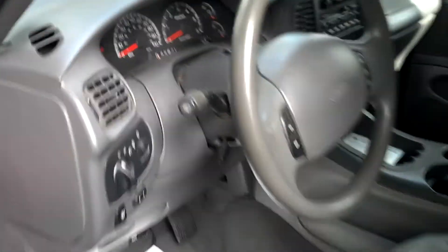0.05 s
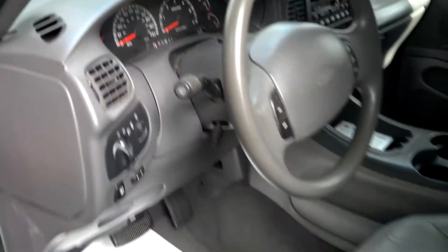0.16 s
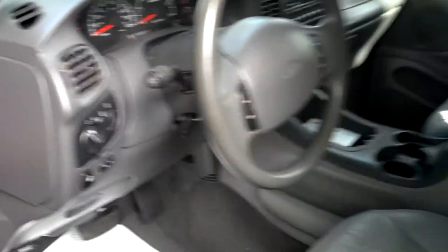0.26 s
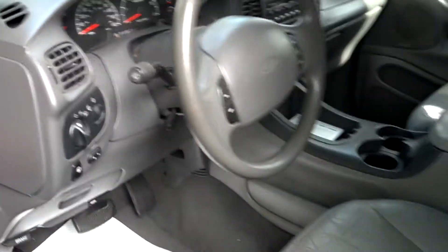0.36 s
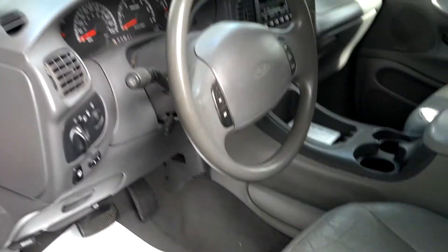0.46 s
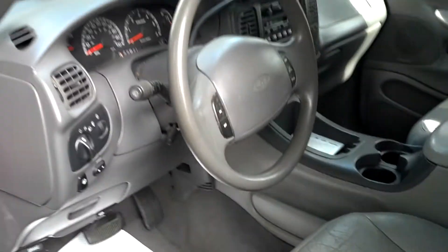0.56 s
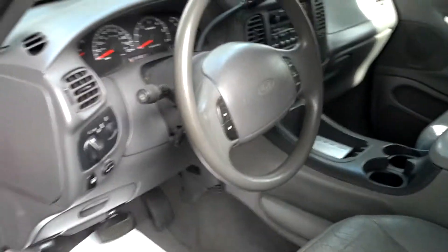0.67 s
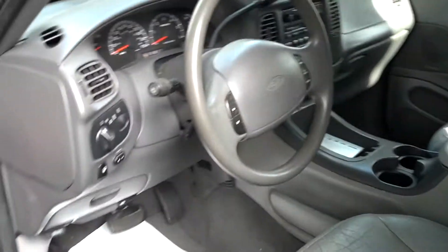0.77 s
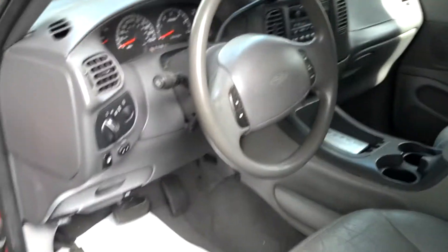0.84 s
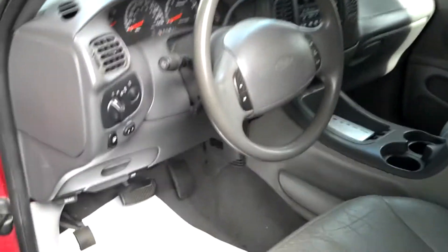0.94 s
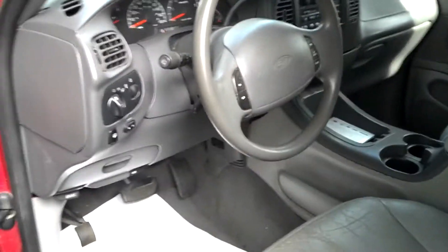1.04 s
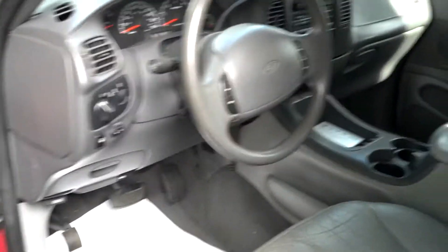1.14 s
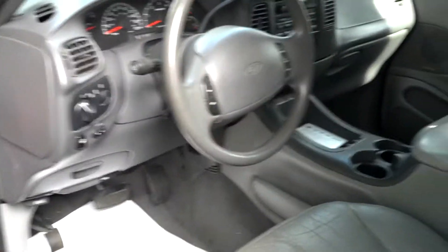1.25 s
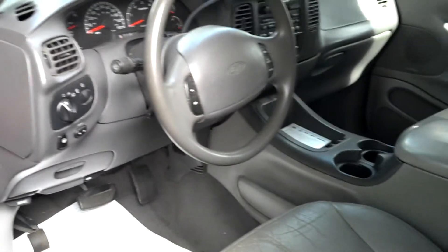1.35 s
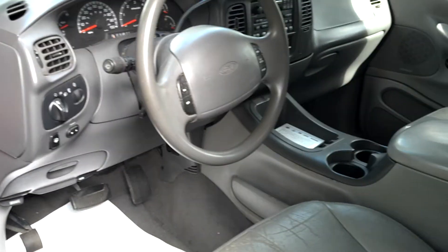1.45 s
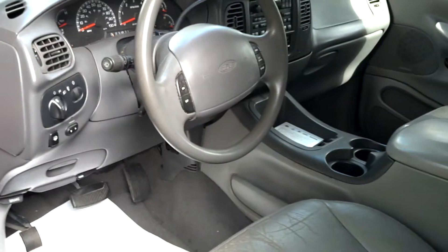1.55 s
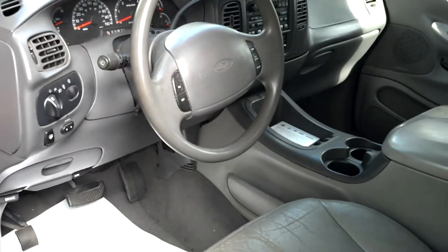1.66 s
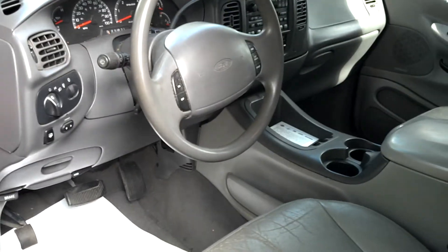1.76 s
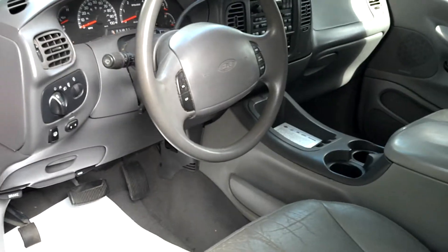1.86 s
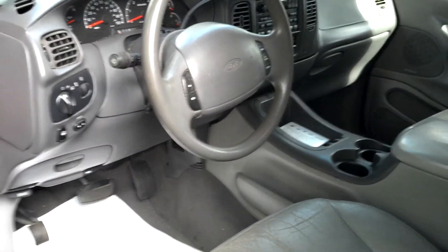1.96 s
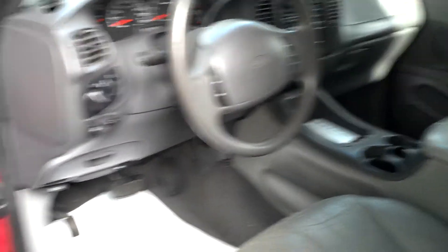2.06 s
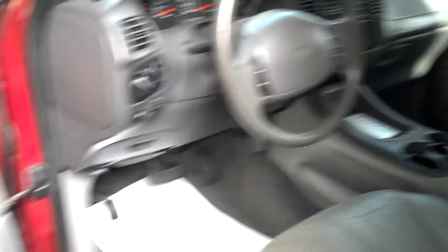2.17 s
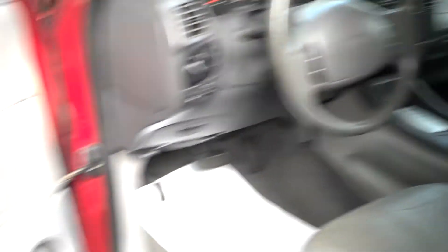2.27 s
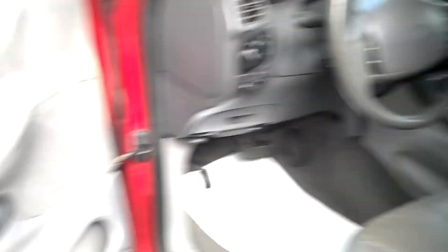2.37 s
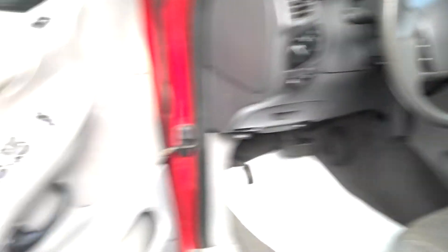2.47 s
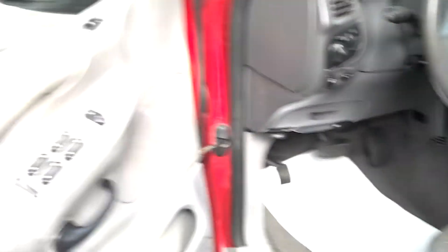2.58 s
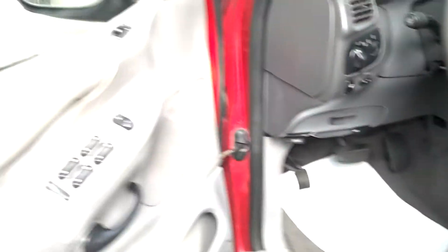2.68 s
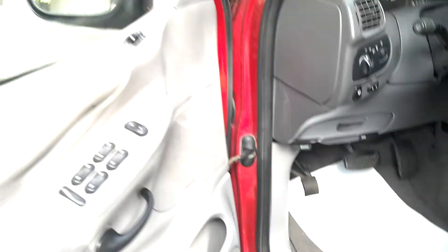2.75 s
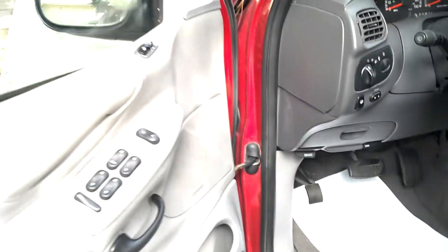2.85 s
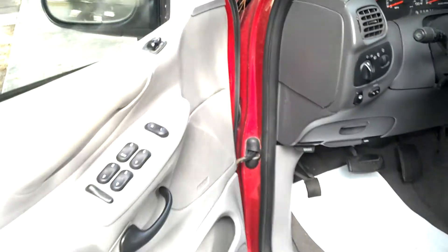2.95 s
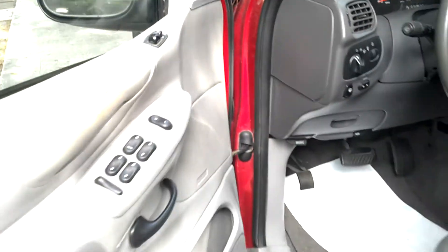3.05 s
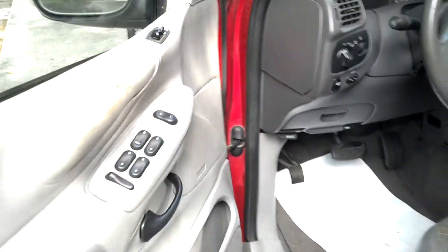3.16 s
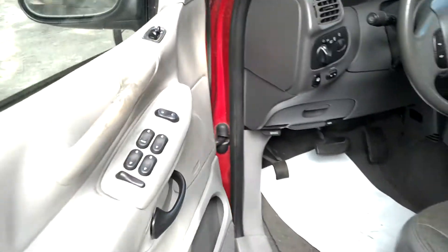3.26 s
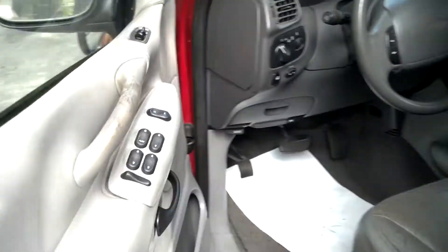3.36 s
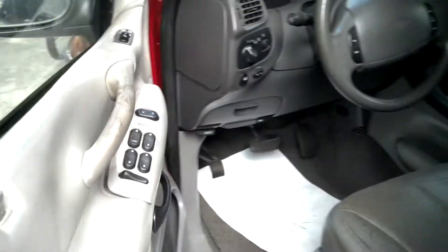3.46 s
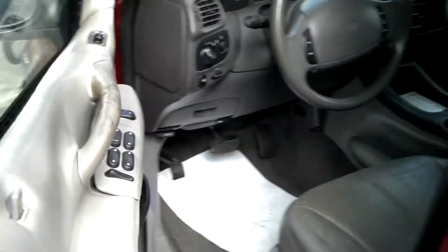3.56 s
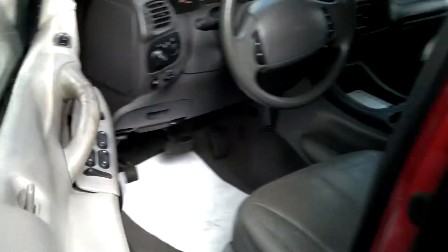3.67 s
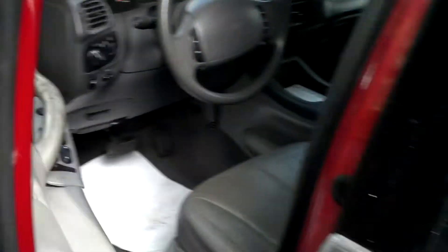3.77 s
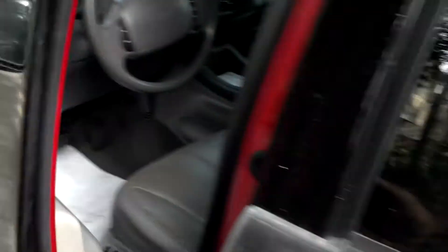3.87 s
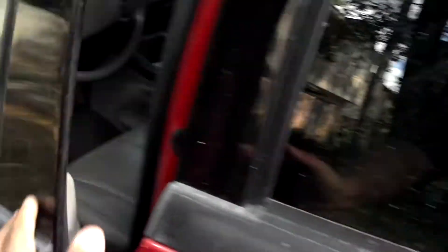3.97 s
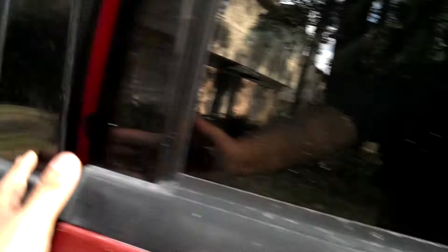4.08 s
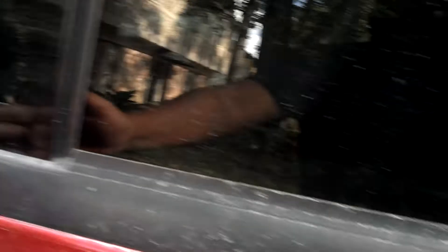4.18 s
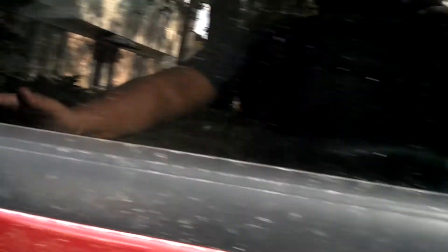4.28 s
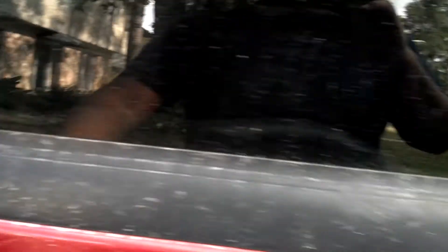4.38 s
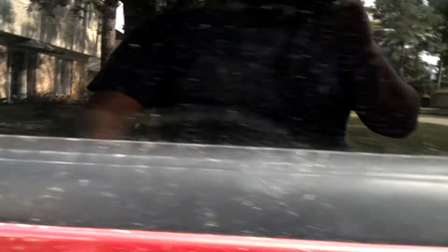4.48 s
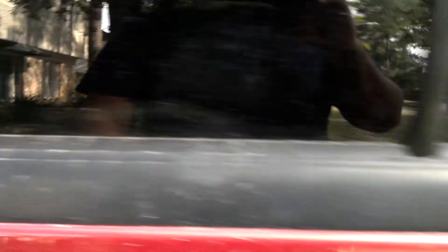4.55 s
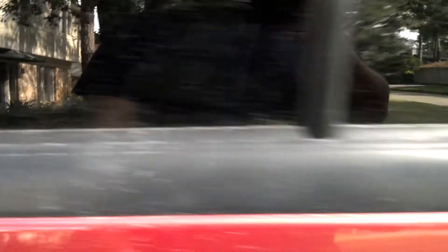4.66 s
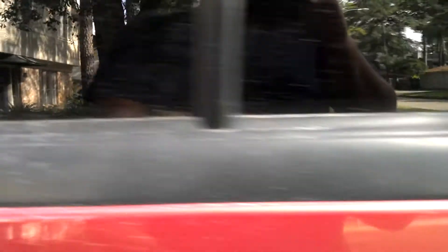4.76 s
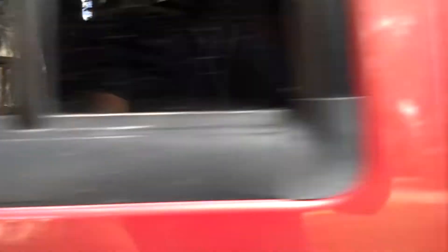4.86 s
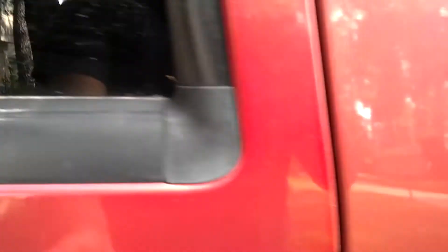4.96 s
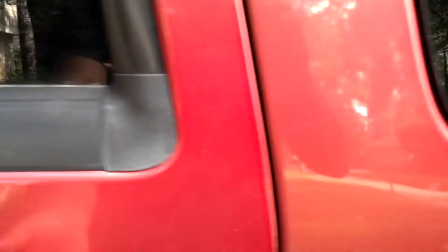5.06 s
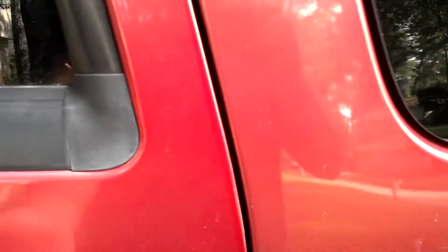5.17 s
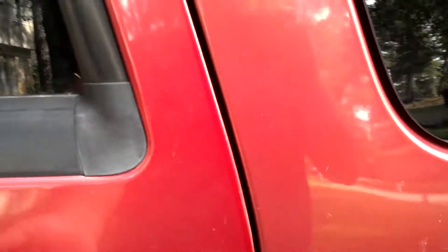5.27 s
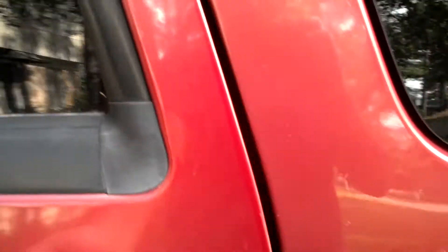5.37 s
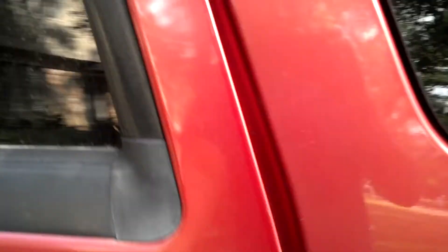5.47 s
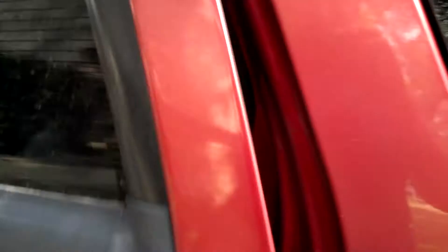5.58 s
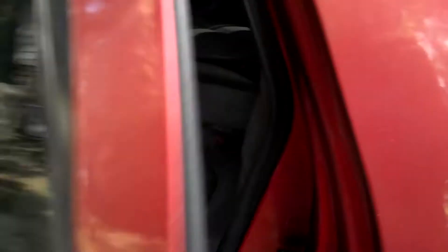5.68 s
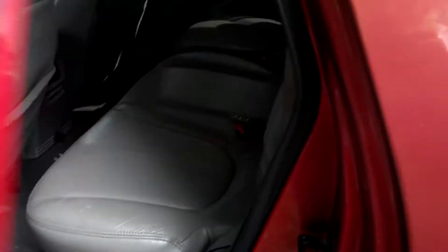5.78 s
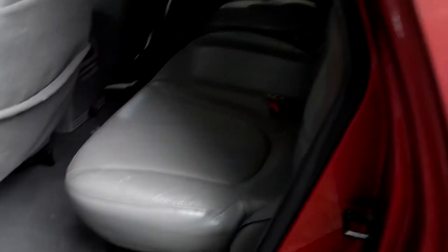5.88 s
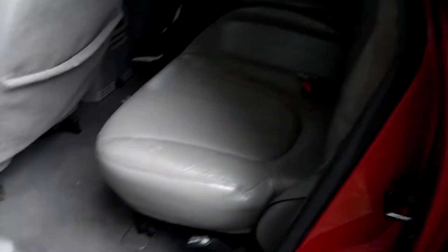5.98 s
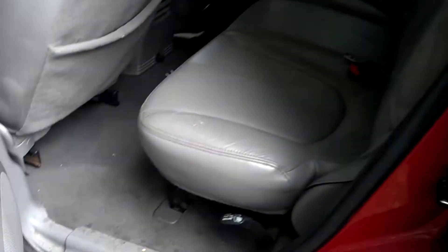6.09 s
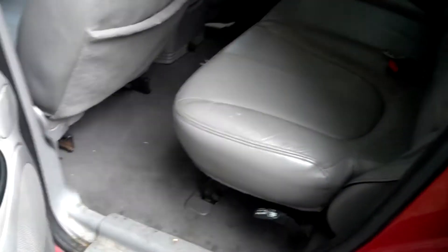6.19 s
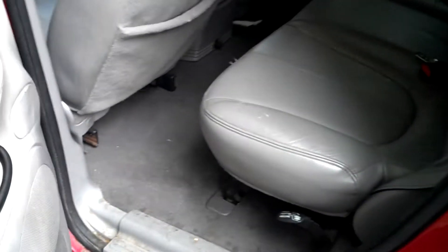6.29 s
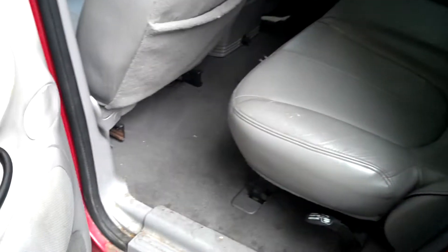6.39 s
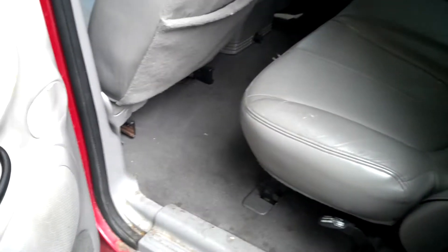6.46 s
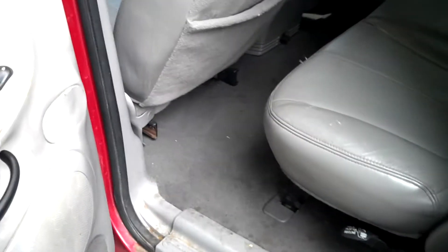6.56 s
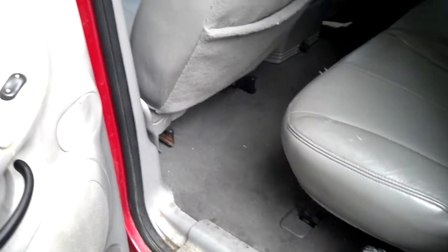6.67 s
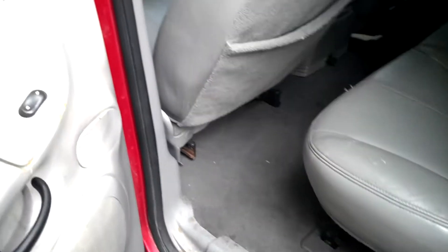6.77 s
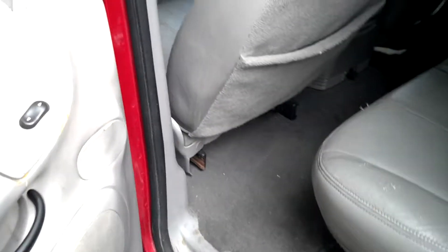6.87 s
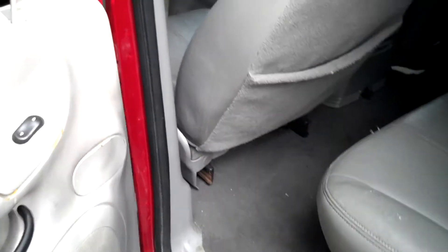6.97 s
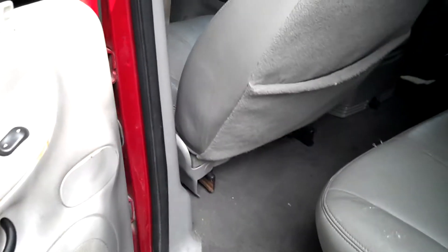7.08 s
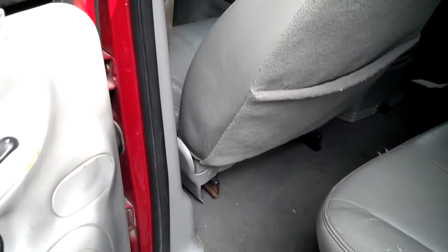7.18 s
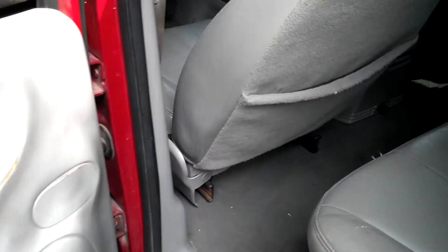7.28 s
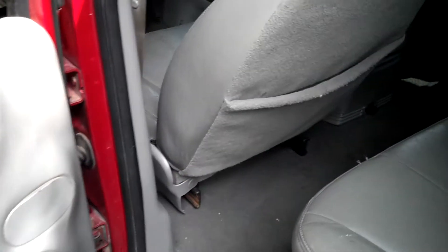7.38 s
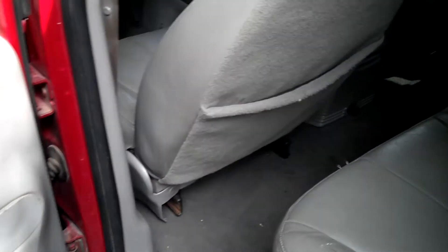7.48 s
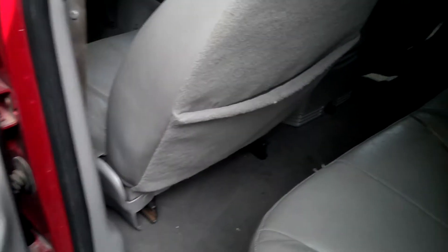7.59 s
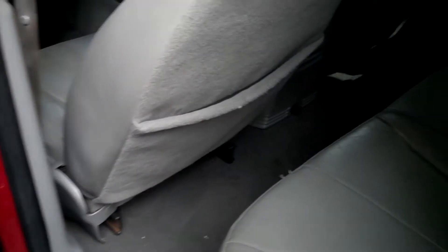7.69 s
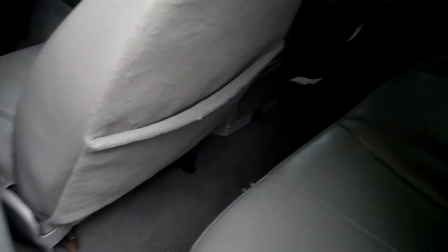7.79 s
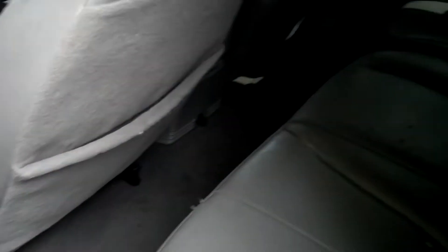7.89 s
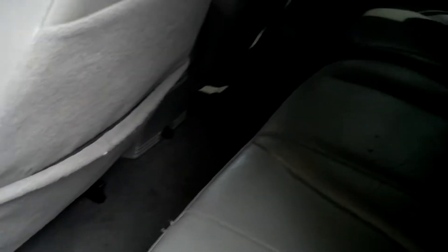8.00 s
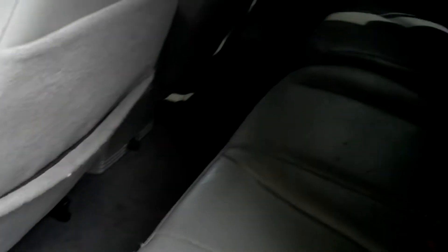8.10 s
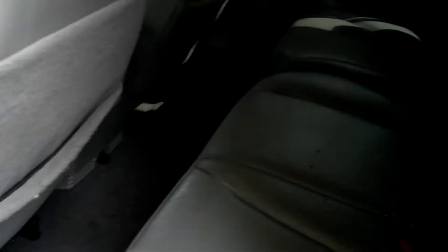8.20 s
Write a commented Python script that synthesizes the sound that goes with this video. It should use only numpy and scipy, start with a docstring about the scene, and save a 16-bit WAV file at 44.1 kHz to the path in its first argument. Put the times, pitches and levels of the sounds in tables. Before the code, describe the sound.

Outdoors in summer, a bright cicada hiss around 4 to 9 kHz, with thin shrill tones coming and going, lies over a low distant hum. Soft low microphone bumps occur near 0.6, 0.7, 1.4, 2.1, 2.4 and 2.6 seconds, and a faint brush at 3.5. At about 4.26 a car door slams loudly: a tiny falling steel squeal, clustered sharp metal cracks, hollow ringing panels, low seal thumps, and a rattle dying by 4.45, with a short yard echo. The background drops abruptly and slowly climbs partway back. Dull handling bumps follow from 4.5 to 5.0. A faint two-note falling bird whistle sounds at 5.0, then light handle ticks. At 5.44 the rear latch releases with a quick ringing clack, low knock and small rattle. Faint ticks and bumps continue around 5.9 to 7.2; the bird repeats at 6.7, and the hiss lasts until about 8.2.

```python
"""Beside a parked car on a summer day the front door is swung shut, then the rear door's latch is pulled open.
The slam is a sliding steel squeal, metal cracks, ringing panels and low seal thumps; the latch is a ringing clack.
Cicadas, coloured noise with shrill tones, hiss over a low distant hum, and a bird calls twice in gliding partials.
The hand-held microphone takes soft low bumps; ticks, brushes and a low latch knock are short bursts of noise.
The whole background drops at the slam and slowly creeps part of the way back."""
import sys
import numpy as np
from scipy import signal
from scipy.fft import rfft, irfft, next_fast_len
from scipy.io import wavfile

SR = 44100
rng = np.random.default_rng(int(sys.argv[2]) if len(sys.argv) > 2 else 0)


def dump_mix(stems):
    """Bounce the given channels to the path in sys.argv[1] as a 16-bit WAV at rate SR."""
    frames = np.atleast_2d(stems).T  # one column per channel
    limited = np.clip(frames, -1, 1)  # hard clip at full scale
    pcm = np.round(limited * 32767).astype(np.int16)
    wavfile.write(sys.argv[1], SR, pcm)


N = 363173


def slam(yard_s=4.285, yard_db=-33, crack_t60_s=0.029):
    """The claw rides over the striker and snaps home; the door hits its seal, rebounds and rattles."""
    # Metal contacts of latch and rebounding door. Each row: start in seconds, crack level in dB, body level in dB.
    contacts = [(4.2657, -13, -29), (4.2725, -6.5, -15.5), (4.2790, -14.5, -18), (4.295, -35, -33),
                (4.3136, -18.5, -23), (4.3168, -20, -23.5)]
    # Colour of the metal crack. Each row: frequency in Hz, level in dB per Hz.
    crack_colour = [(300, -32), (1000, -14), (2400, -4), (3500, 0), (4400, -7), (5500, 2.5), (7500, -0.5),
                    (11000, -7), (15500, -18)]
    # Door skin and trim. Each row: frequency in Hz, level in dB per Hz, t60 in seconds.
    door_body = [(50, -28, .15), (110.4, -5, .18), (200, -7, .13), (414, -2, 0.098), (700, -3.5, 0.049),
                 (1180, -7, 0.06), (2220, -11, 0.083), (3500, -16, .05), (7000, -30, .04),
                 (15000, -46, .04)]
    # Modes of hollow door and cabin. Each row: frequency in Hz, level in dB, t60 in seconds.
    panel_modes = [(128, -23, .3), (166, -19, 0.84), (240, -16, 0.19), (298, -7, 0.28), (427, -12, 0.14),
                   (620, -16, .16), (887, -27, 0.27), (1015, -19, .16), (1157, -27.5, .25),
                   (1580, -24, .18)]
    # Door pushing on its seal. Each row: start in seconds, level in dB, frequency in Hz, cycles to fullest swing.
    seal_pushes = [(4.2805, -9.5, 287, 0.57), (4.315, -13, 275, .6), (4.3712, -21, 280, 0.54)]

    out = latch_squeal()
    # the shut door rattles on in a dying run of touches
    dying_run = rattle(4.329, gap_s=0.0215, db=-30.5, loss_db=2.6, count=5)
    touches = [(s, db - 8.5, db) for s, db in dying_run]
    for s, crack_db, body_db in list(contacts) + touches:
        crack = noise(crack_colour, size=len(age())) * fade(crack_t60_s)
        add(out, s, from_db(crack_db) * crack)
        add(out, s, from_db(body_db) * clatter(door_body))
    for s, db, hz, cycles in seal_pushes:
        push = thump(hz, cycles) + from_db(-10) * ring(panel_modes)
        add(out, s, from_db(db) * push)
    add(out, yard_s, from_db(yard_db) * yard())
    return out


def latch_squeal(rasp_db=1.0):
    """Steel sticks and slips on steel: a rough squeal that falls as the claw turns."""
    # Claw rubbing over the striker. Each row: time in seconds, squeal pitch in Hz, level in dB.
    ride = [(4.2548, 1444, -90), (4.2558, 1420, -20), (4.2635, 1330, -19), (4.2680, 1120, -23.5),
            (4.2730, 1055, -19.5), (4.2790, 940, -26), (4.2880, 900, -90)]
    # Rasp of claw on striker. Each row: frequency in Hz, level in dB per Hz.
    rasp_colour = [(200, -35), (600, -2), (1300, -4), (2100, -4), (2900, -13), (3800, -20), (12000, -35)]
    hz, db = in_time(ride)
    squeal = wavering_tone(hz, wander_hz=89.8, rate=294)
    rasp = from_db(rasp_db) * long_noise(rasp_colour)
    return from_db(db) * (squeal + rasp)


def rattle(start, gap_s, db, loss_db, count):
    """A run of evenly spaced touches, each weaker than the last, as pairs of seconds and dB."""
    return [(start + k * gap_s, db - k * loss_db) for k in range(count)]


def yard(build_s=0.014):
    """The yard's answer to a blow builds up and dies away, each octave at its own rate."""
    # The yard's reverberation. Each row: frequency in Hz, level in dB per Hz, t60 in seconds.
    yard_body = [(60, -14, .4), (150, 4, 0.64), (420, -5, 0.68), (800, -15, 0.73), (1600, -11, 0.54),
                 (2800, -10, .38), (5000, -20, 0.33), (14000, -40, .2)]
    return clatter(yard_body) * (1 - np.exp(-age() / build_s))


def rear_door(lowest_hz=75, yard_db=-45):
    """The latch springs free with a ringing clack, and its rods rattle."""
    # Latch letting go. Each row: start in seconds, clack level in dB.
    releases = [(5.4358, -31), (5.4393, -18), (5.4424, -24), (5.4589, -32)]
    # Body of the clack. Each row: frequency in Hz, level in dB per Hz, t60 in seconds.
    clack_body = [(25, -45, .06), (65, -14, 0.087), (124, 2, 0.16), (280, -11, 0.099), (654, 2, .08),
                  (1100, -3.5, 0.044), (1920, 3.5, 0.051), (2930, -16, .045), (4600, -12, 0.056),
                  (7000, -19, .03), (15000, -36, .03)]
    # Modes that ring with the claw. Each row: frequency in Hz, level in dB, t60 in seconds.
    claw_modes = [(253, -17, 0.13), (402, -13, 0.09), (510, -17, 0.16), (662, -6, 0.097), (870, -14, 0.068),
                  (1160, -15, .14), (1450, -9, .06), (1640, -6, 0.07), (1809, -11.5, 0.27),
                  (1990, -12, 0.04), (2190, -21, 0.21), (2760, -18, .08), (4620, -18, 0.06)]

    out = np.zeros(N)
    rods = rattle(5.482, gap_s=0.015, db=-36.5, loss_db=6, count=3)
    for s, db in list(releases) + rods:
        add(out, s, from_db(db) * clatter(clack_body))
    # the claw flies against its stop and rings
    claw_s, claw_db = 5.4393, -22
    add(out, claw_s, from_db(claw_db) * ring(claw_modes) + from_db(yard_db) * yard())
    # so small a part radiates no deep bass
    return signal.sosfilt(signal.butter(4, lowest_hz, "high", fs=SR, output="sos"), out)


def handling(cycles=0.47, shudder_t60=0.16):
    """Knocks that bounce once and dull bumps, each with a short shudder, and the lumpy rumble of the grip."""
    # Fingers knocking on the microphone's case. Each row: start in seconds, level in dB.
    knocks = [(0.570, -25), (2.148, -28.5), (2.3559, -20), (2.630, -20), (6.152, -30), (6.652, -33)]
    # Dull bumps through the hand. Each row: start in seconds, level in dB.
    bumps = [(0.74, -26), (1.374, -30), (4.483, -20.5), (4.527, -25.5), (4.797, -22), (4.914, -33),
             (4.954, -35), (5.008, -35.5), (5.99, -40), (6.554, -34), (7.166, -30.5)]
    # Grip shifting. Each row: start in seconds, length in seconds, level in dB.
    grip_shifts = [(4.38, 0.18, -45), (4.61, 0.64, -52), (6.5, 0.19, -50), (6.92, 0.32, -54)]
    # pairs of Hz and dB per Hz
    rumble = [(25, -28), (60, -16), (110, 5.5), (170, -8.5), (300, -20.5), (900, -64), (3000, -90)]
    knock_hz, knock_shudder_db = 347, -11
    bump_hz, bump_shudder_db = 133, -9.5
    bounce_s, bounce_db = 0.0071, -9.5  # delay after the knock, level against it

    grip = sum(from_db(db) * swell(s, length, fade_s=0.028) for s, length, db in grip_shifts)
    lumps = from_db(3.5 * drift(20))
    out = grip * lumps * long_noise(rumble)
    for blows, hz, shudder_db in (knocks, knock_hz, knock_shudder_db), (bumps, bump_hz, bump_shudder_db):
        for s, db in blows:
            shudder = noise(rumble, size=len(age())) * fade(shudder_t60) * (1 - fade(.06))
            add(out, s, from_db(db) * (thump(hz, cycles) + from_db(shudder_db) * shudder))
    for s, db in knocks:
        add(out, s + bounce_s, from_db(db + bounce_db) * thump(knock_hz, cycles))
    return out


def ticks(rise_s=0.0064):
    """Ticks, brushes and one low latch knock, each a short burst of noise about one pitch."""
    # Ticks and brushes of handle, hinge and trim, and the low knock of the rear latch's second blow.
    # Each row: start in seconds, level in dB, pitch in Hz, t60 in seconds,
    # level an octave away from the pitch in dB.
    bursts = [(0.568, -37.5, 800, 0.089, -1), (0.774, -41, 2200, .2, -2), (3.467, -40, 490, 0.18, -17),
              (5.229, -46, 1600, .06, -12), (5.354, -44, 1540, .04, -35), (5.390, -39, 1440, .03, -55),
              (5.4575, -26, 460, 0.045, -22), (5.541, -44, 430, 0.13, -20), (5.875, -51, 3200, 0.11, -25),
              (6.652, -35.5, 980, 0.065, -7), (6.912, -47, 1600, 0.1, -30), (8.034, -41, 1920, 0.03, -15)]
    out = np.zeros(N)
    for s, db, hz, t60, skirt_db in list(bursts) + fidgets():
        colour = [(hz / 10, skirt_db - 2), (hz / 2, skirt_db), (hz, 0),
                  (hz * 2, skirt_db), (hz * 10, skirt_db - 50)]
        burst = noise(colour, size=len(age())) * fade(t60) * (1 - fade(rise_s))
        add(out, s, from_db(db) * burst)
    return out


def fidgets(spread_db=2.0, spread_octaves=0.32, skirt_db=-10):
    """Handle and swinging door tick faintly at uneven times, strengths and pitches."""
    # Spells of faint ticking. Each row: start in seconds, end in seconds.
    spells = [(5.06, 5.4), (5.89, 6.0)]
    gap_s, middle_db, middle_hz, t60_s = 0.045, -51, 1240, 0.07
    times = np.concatenate([np.arange(start, end, gap_s) for start, end in spells])
    chances = rng.uniform(-1.1, 1, (len(times), 3))
    rows = []
    for s, (late, force, pitch) in zip(times, chances):
        start = s + gap_s * late / 2
        db = middle_db + spread_db * force
        hz = middle_hz * 2 ** (spread_octaves * pitch)
        rows.append((start, db, hz, t60_s, skirt_db))
    return rows


def bird(sag_db=-7, echo_db=-4, trees_t60=0.91, tremble_db=3.0):
    """Two falling whistles to a call, each with three partials, smeared by the trees."""
    # Notes of a call. Each row: delay in seconds, length in seconds, start pitch in Hz, end pitch in Hz,
    # level in dB, first partial in dB, third partial in dB (both against the second).
    notes = [(0, 0.154, 1504, 1447, -4.5, -4, -16), (0.108, 0.235, 1255, 1153, 1, -23, -8)]
    # Calls. Each row: start in seconds, level in dB.
    calls = [(5.028, -53), (6.736, -51.5)]
    out = np.zeros(N)
    for delay, length, start_hz, end_hz, db, first_db, third_db in notes:
        along = np.minimum(age() / length, 1)
        phase = 2 * np.pi * np.cumsum(start_hz + (end_hz - start_hz) * along) / SR
        edges = np.clip(along * 10, 0, 1) * np.clip((1 - along) * 10, 0, 1)
        envelope = edges * from_db(db + sag_db * along)
        partials = [first_db, 0, third_db]
        tone = sum(from_db(part_db) * np.sin((k + 1) * phase) for k, part_db in enumerate(partials))
        for s, call_db in calls:
            add(out, s + delay, from_db(call_db) * envelope * tone)
    out = out * from_db(tremble_db * drift(22))  # the whistle trembles
    trees = rng.standard_normal(len(age())) * fade(trees_t60)
    trees = trees / np.linalg.norm(trees)
    return out + from_db(echo_db) * signal.fftconvolve(out, trees)[:N]


def background(hum_db=-46, hum_sway_db=0.74):
    """Cicadas, a distant hum with one faint tone, and open air, all sinking together at the slam."""
    # Colour of the hum. Each row: frequency in Hz, level in dB per Hz.
    hum_colour = [(20, -18), (45, -15), (75, -11.5), (105, 1), (150, -4.5), (200, -4.5), (300, -6.5),
                  (440, -11), (540, -12.5), (800, -21), (2000, -47)]
    # Colour of the open air. Each row: frequency in Hz, level in dB per Hz.
    air_colour = [(250, -29), (600, -1.5), (1100, 0.5), (1700, -0.5), (1950, 0.5), (2300, -3), (3000, -5.5),
                  (5000, 4.5), (9000, -40)]
    # Loudness of the cicada chorus before the dip. Each row: time in seconds, level in dB.
    chorus_level = [(0, -28.5), (1.0, -27.5), (2.3, -28), (3.65, -30), (4.22, -27.2), (4.5, -30.5),
                    (5.7, -27.5), (6.05, -30), (8.24, -28.5)]
    # Loudness of the open air before the dip. Each row: time in seconds, level in dB.
    air_level = [(0, -48.5), (3.3, -48.5), (4.2, -45.5), (8.24, -45.3)]

    chorus = from_db(in_time(chorus_level)[0]) * cicadas()
    hum = long_noise(hum_colour) + from_db(-8.5) * wavering_tone(420.7, wander_hz=3.95, rate=12.16)
    hum = from_db(hum_db + hum_sway_db * drift(2.4)) * hum
    air = from_db(in_time(air_level)[0]) * off_the_car(long_noise(air_colour), echo_db=-20.0)
    return dip() * (chorus + hum + air)


def dip(start_s=4.262, fall_s=0.066, depth_db=14.5, recovery_db_per_s=1.95):
    """Gain of the background: a quick fall at the slam against a slow, steady climb."""
    since = np.maximum(np.arange(N) / SR - start_s, 0)
    fall_db = depth_db * np.minimum(since / fall_s, 1)
    return from_db(np.minimum(recovery_db_per_s * since - fall_db, 0))


def cicadas(flutter_db=0.18, count=12):
    """A far chorus merges into hiss; narrow shrill tones come and go in it."""
    # Colour of the hiss. Each row: frequency in Hz, level in dB per Hz.
    hiss_colour = [(2500, -27), (3400, -24.5), (3750, -17), (4100, -9.5), (4800, -9.5), (5600, -4),
                   (6800, -3), (8300, 0), (9100, -3), (10000, -12.5), (11500, -18.5), (13000, -24),
                   (15700, -30.5), (18000, -44)]
    # Narrow shrill tones that stand out of the hiss for a while. Each row: start in seconds,
    # length in seconds, pitch in Hz, level in dB against the hiss.
    clear_shrills = [(-0.1, 0.9, 7900, -9), (0, 0.88, 7113, -14), (0.95, 0.64, 4485, -15),
                     (0.5, 0.88, 8177, -13), (1.3, 1.0, 8700, -12.5), (0.8, 0.59, 8500, -10),
                     (6.5, 1.9, 7500, -11), (7.7, 0.7, 7500, -11.5)]
    chorus = off_the_car(long_noise(hiss_colour), echo_db=-16.5)
    chorus = chorus + sum(shrill(*row) for row in clear_shrills)
    # fainter ones follow at even spacing, each at a random pitch
    faint_hz, faint_spread_hz, faint_length_s, faint_db = 8310, 600, 0.97, -18
    for middle in np.linspace(0, N / SR, count):
        hz = faint_hz + faint_spread_hz * rng.uniform(-1, 1)
        chorus = chorus + shrill(middle - faint_length_s / 2, faint_length_s, hz, faint_db)
    return chorus * from_db(flutter_db * drift(16))


def shrill(start, length, hz, db, shimmer_db=2.5):
    """One shrill tone, shimmering in level and wavering in pitch."""
    shimmer = from_db(db + shimmer_db * drift(13))
    return swell(start, length, fade_s=0.15) * shimmer * wavering_tone(hz, wander_hz=16, rate=39.7)


def off_the_car(x, echo_db):
    """Glass and panels throw back a handful of short echoes, which ripple the spectrum."""
    lags = (rng.uniform(.001, .02, size=8) * SR).astype(int)
    return rms_one(x + from_db(echo_db) * sum(np.roll(x, lag) for lag in lags))


def microphone_noise(level_db=-64.5):
    """The microphone's own steady noise."""
    # Colour of that noise. Each row: frequency in Hz, level in dB per Hz.
    self_colour = [(20, 10), (70, 12), (200, -2), (1000, -10), (6000, -14), (15000, -10)]
    return from_db(level_db) * long_noise(self_colour)


def ring(modes):
    """One blow on a set of decaying modes, each struck a little differently, signs alternating."""
    out = 0
    for k, (hz, db, t60) in enumerate(modes):
        strength = from_db(db + rng.normal(0, 1)) * (-1) ** k
        out = out + strength * np.sin(2 * np.pi * hz * age()) * fade(t60)
    return out


def clatter(body):
    """Countless close modes: noise scaled to rms 1, then each octave dying at its own rate."""
    size = len(age())
    spectrum, hz = rfft(noise(body, size=size)), np.fft.rfftfreq(size, 1 / SR)
    out = 0
    for centre in 32 * 2. ** np.arange(10):
        # overlapping triangular octave bands
        share = np.maximum(1 - abs(np.log2((hz + 1) / centre)), 0)
        out = out + irfft(spectrum * share) * fade(at_hz(body, centre, axis=2))
    return out


def thump(hz, cycles):
    """A soft push: a low swing that swells and dies within a few cycles."""
    progress = age() * hz / cycles
    return progress * np.exp(1 - progress) * np.sin(2 * np.pi * hz * age())


def wavering_tone(hz, wander_hz, rate):
    """A tone of rms 1 whose pitch wanders at random about hz."""
    return np.sqrt(2) * np.sin(2 * np.pi * np.cumsum(hz + wander_hz * drift(rate)) / SR)


def drift(rate):
    """Smoothed chance of spread 1: noise through two equal low-pass poles at rate Hz."""
    step = 40  # samples between random draws
    r = np.exp(-2 * np.pi * rate * step / SR)
    slow = signal.lfilter([1], [1, -2 * r, r * r], rng.standard_normal(N // step + 2002))
    slow = slow[2000:]  # drop the filter's settling
    return np.interp(np.arange(N) / step, np.arange(len(slow)), rms_one(slow))


def noise(spectrum, size=N):
    """Noise of a given colour, rms 1."""
    hz = np.fft.rfftfreq(size, 1 / SR)
    white = rfft(rng.standard_normal(size))
    return rms_one(irfft(white * from_db(at_hz(spectrum, hz)), size))


def long_noise(spectrum):
    """Coloured noise for the whole scene."""
    return noise(spectrum, size=next_fast_len(N, True))[:N]


def at_hz(points, hz, axis=1):
    """Read a column of a spectrum on a log-frequency axis."""
    points = np.array(points)
    return np.interp(np.log(hz + 1), np.log(points[:, 0]), points[:, axis])


def in_time(rows):
    """Each column of a curve at every sample."""
    s, *columns = np.transpose(rows)
    return [np.interp(np.arange(N) / SR, s, column) for column in columns]


def swell(start, length, fade_s):
    """Fade in, hold, fade out."""
    since = np.arange(N) / SR - start
    return np.clip(np.minimum(since, length - since) / fade_s, 0, 1)


def age():
    """Seconds since a blow, for as long as it can ring."""
    return np.arange(2 ** 15) / SR


def fade(t60):
    """Exponential decay by 60 dB in t60 seconds."""
    return np.exp(-np.log(1000) * age() / t60)


def add(out, s, sound):
    """Mix a sound in at time s."""
    start = round(s * SR)
    out[start:start + len(sound)] += sound[:N - start]


def from_db(db):
    """Decibels to gain."""
    return 10 ** (np.asarray(db) / 20)


def rms_one(x):
    """Scale to unit power."""
    return x / np.sqrt(np.mean(x ** 2) + 1e-20)


def scene():
    """Everything reaches one microphone, alike in both channels."""
    car = slam() + rear_door() + ticks()
    mono = car + handling() + bird() + background() + microphone_noise()
    return np.array([mono, mono])


def record(dry, bass_cut_hz=45, top_cut_hz=15750, ceiling=.75):
    """The deepest bass is lost, the highest peaks are rounded and the top is cut."""
    thin = signal.sosfilt(signal.butter(2, bass_cut_hz, "high", fs=SR, output="sos"), dry)
    rounded = ceiling * np.tanh(thin / ceiling)
    return signal.sosfilt(signal.ellip(12, .1, 80, top_cut_hz, fs=SR, output="sos"), rounded)


dry = scene()
out = record(dry)
dump_mix(out)
```